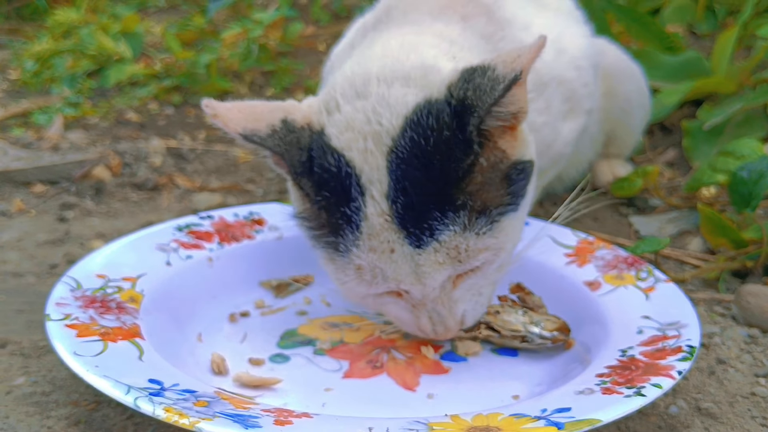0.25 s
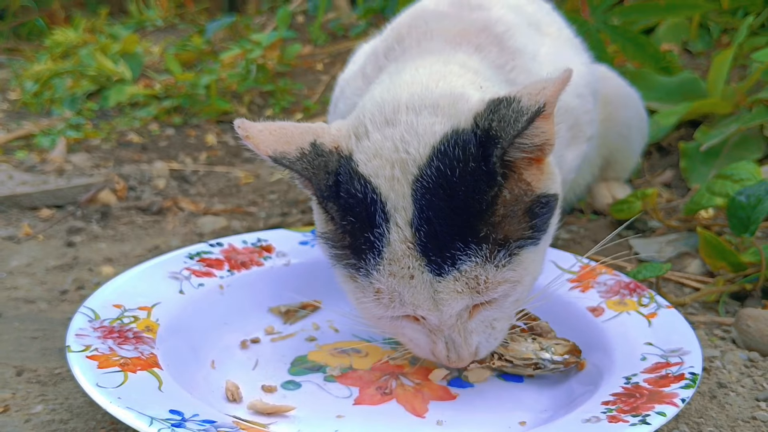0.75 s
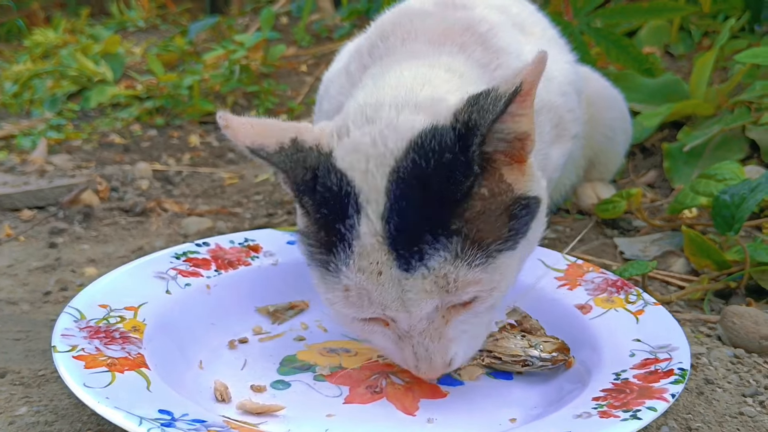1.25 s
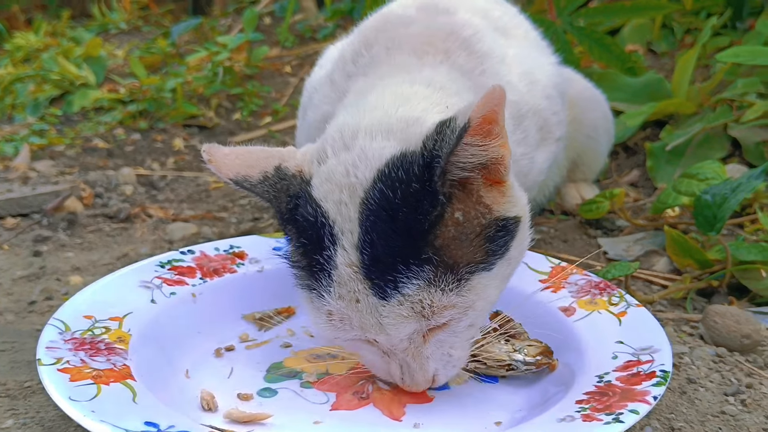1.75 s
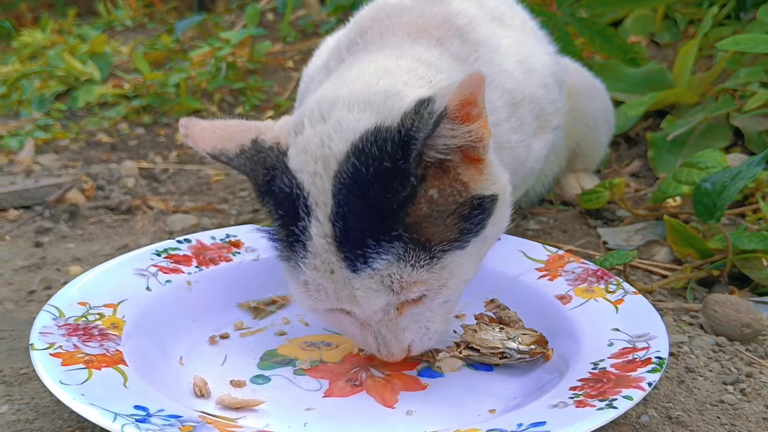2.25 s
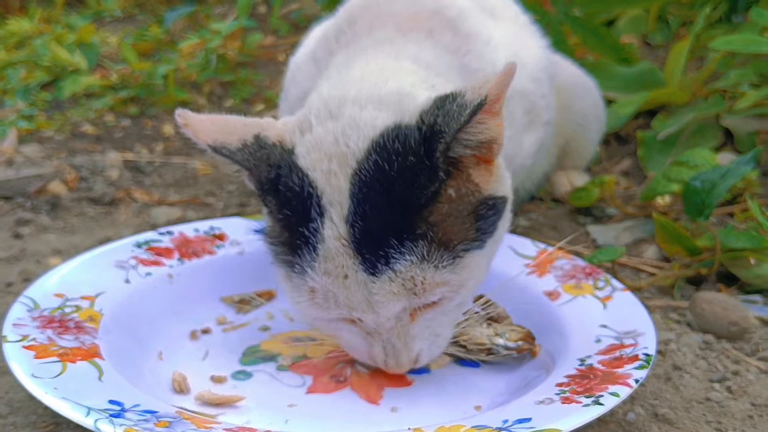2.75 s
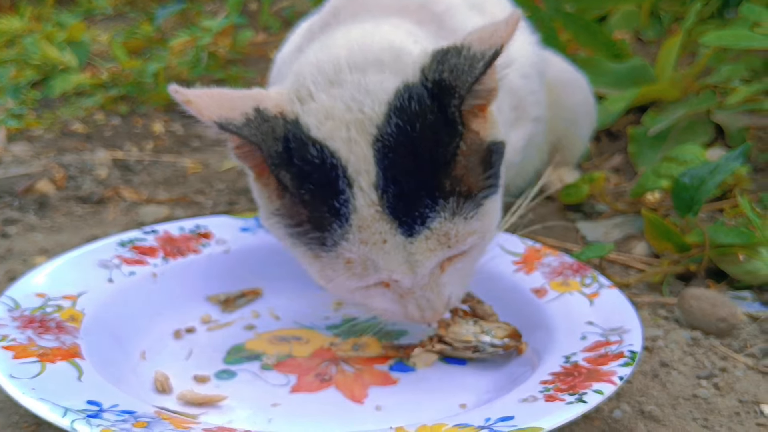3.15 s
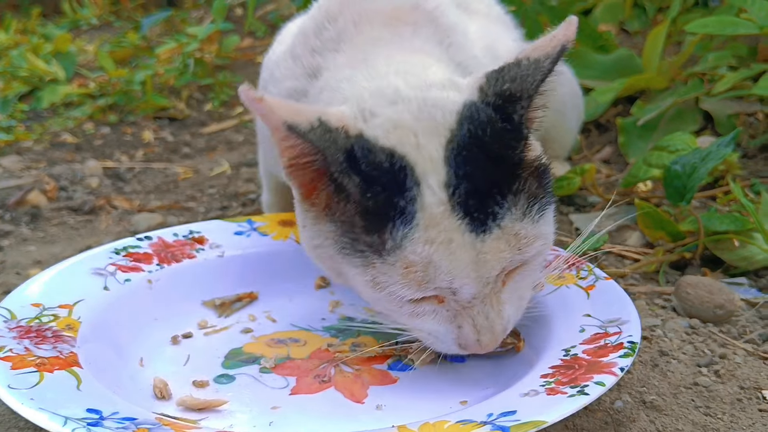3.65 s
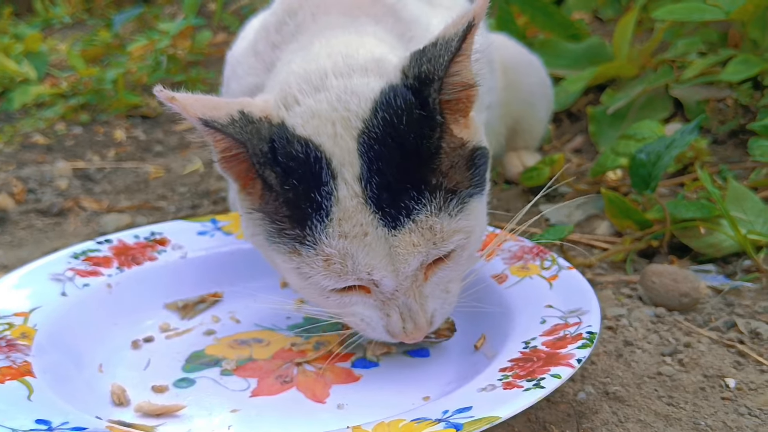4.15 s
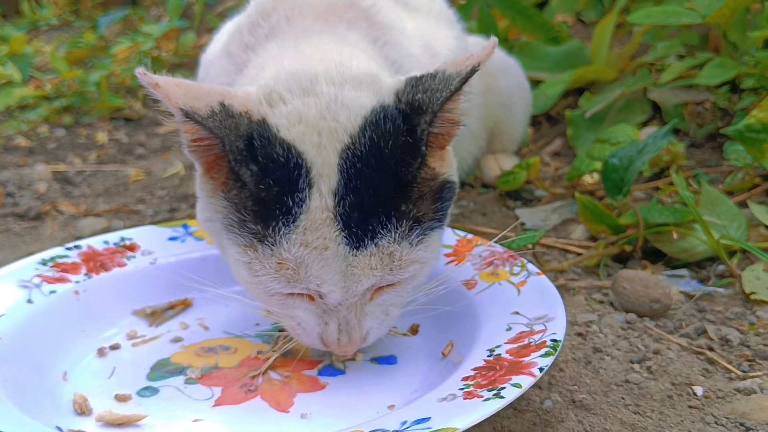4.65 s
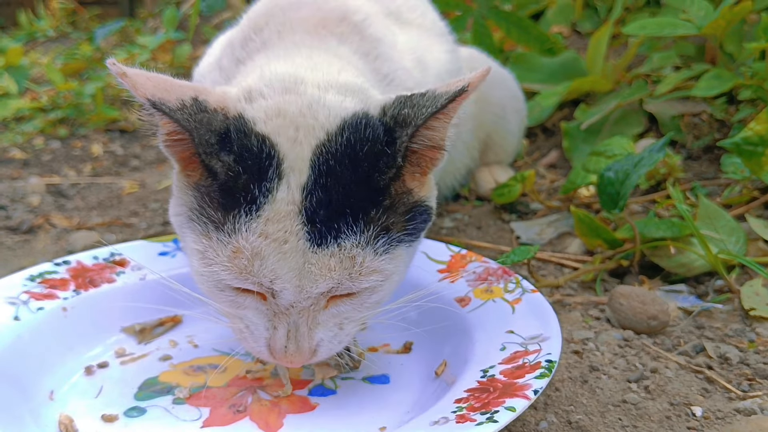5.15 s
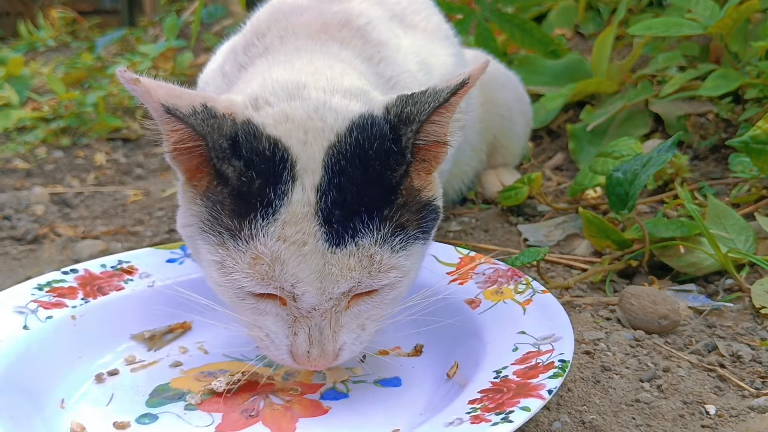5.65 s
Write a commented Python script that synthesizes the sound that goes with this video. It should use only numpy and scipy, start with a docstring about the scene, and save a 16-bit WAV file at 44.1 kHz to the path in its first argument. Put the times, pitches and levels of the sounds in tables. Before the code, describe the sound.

Close crisp bone-and-crust crunching by a cat eating from a plate outdoors, with a dull motor rumble, pulsing insects, chirps and a distant crow.

```python
"""A cat crunches fried fish on a plate, close by: sharp noise bursts are crust and small bones snapping.
Jaw crackle, wet smacks, tooth clacks and plate rings go with them, built from grains and fading tones.
Behind it lie a far motor (wavering tones in low noise), insects (narrow bands of noise in swells),
chirping birds (gliding tones), a rooster that crows once (hoarse harmonics), soft rustles and outdoor air."""
import sys
import numpy as np
from scipy import signal
from scipy.fft import rfft, irfft, next_fast_len
from scipy.io import wavfile
from scipy.ndimage import uniform_filter1d, map_coordinates

SR = 44100
rng = np.random.default_rng(int(sys.argv[2]) if len(sys.argv) > 2 else 0)


def file_out(sig):
    """Save sig as 16-bit WAV at sys.argv[1]."""
    # one column per channel
    cols = np.atleast_2d(sig).T
    # limit, then scale
    lim = np.clip(cols, -1, 1)
    pcm = np.round(lim * 32767).astype(np.int16)
    wavfile.write(sys.argv[1], SR, pcm)


N = 259749


def amp(db):
    """Turn decibels into gain."""
    return 10 ** (np.asarray(db) / 20)


def unit(x):
    """Scale to an average strength (rms) of 1."""
    return x / np.sqrt(np.mean(x ** 2) + 1e-20)


def along(points, hz):
    """Read a curve of (f/Hz, value) points on a logarithmic frequency axis."""
    f, v = np.transpose(points)
    return np.interp(np.log(hz + 1), np.log(f + 1), v)


def curves(rows):
    """Draw lines through timed rows: one value per sample for each column after the time."""
    s, *cols = np.transpose(rows)
    return [np.interp(np.arange(N) / SR, s, c) for c in cols]


def wobble(rate):
    """A smooth random curve with rate knots a second."""
    knots = rng.standard_normal(int(N * rate / SR) + 4)
    return map_coordinates(knots, [np.arange(N) * rate / SR])


def filtered(x, response):
    """Multiply the spectrum of x by a response of frequency."""
    m = next_fast_len(N + SR // 2)
    return irfft(rfft(x, m) * response(np.fft.rfftfreq(m, 1 / SR)), m)[..., :N]


def noise(spectrum, channels=2):
    """Coloured noise of rms 1, unrelated between channels."""
    white = rng.standard_normal((channels, N))
    return unit(filtered(white, lambda hz: amp(along(spectrum, hz))))


def field(spectrum, shared_db):
    """Stereo noise of rms 1, part of it common to both channels."""
    return unit(noise(spectrum) + amp(shared_db) * noise(spectrum, channels=1))


def coloured(x, spectrum, size=1024):
    """Colour without smearing attacks backwards in time; white noise keeps its energy."""
    gain = amp(along(spectrum, np.fft.rfftfreq(size, 1 / SR)))
    # folding the cepstrum gives a filter that starts at once (minimum phase)
    cepstrum = irfft(np.log(np.maximum(gain, 1e-2)))
    cepstrum[1:size // 2] *= 2
    cepstrum[size // 2 + 1:] = 0
    h = irfft(np.exp(rfft(cepstrum)))
    return signal.fftconvolve(x, h[None] / np.linalg.norm(h), axes=1)[:, :N]


def grains(grit_db, clump_db):
    """Tiny fractures as noise, uneven in size and bunched in time."""
    unevenness = amp(grit_db * wobble(900) + clump_db * wobble(120))
    return unit(unevenness * rng.standard_normal((2, N)))


def panned(pan_db):
    """Left and right gains of mean power 1; a positive pan is louder on the left."""
    return unit(amp([[pan_db / 2], [-pan_db / 2]]))


def lagged(x, lag_s):
    """Delay the left channel against the right."""
    sides = np.array([[-1], [1]])
    return filtered(x, lambda hz: np.exp(1j * np.pi * hz * lag_s * sides))


def add(track, s, sound):
    """Mix a short sound in at time s."""
    part = track[..., max(round(s * SR), 0):][..., :sound.shape[-1]]
    part += sound[..., :part.shape[-1]]


def cycle(hz):
    """Phase of a moving pitch."""
    return 2 * np.pi * np.cumsum(hz) / SR


def garden(x, t60, wet_db):
    """Direct sound plus scattered echoes that fade by 60 dB in t60 seconds, different in each channel."""
    t = np.arange(SR) / SR
    tail = rng.standard_normal((2, SR)) * amp(-60 * t / t60)
    echo = signal.fftconvolve(np.atleast_2d(x), unit(tail) / np.sqrt(SR), axes=1)[:, :N]
    return (x + amp(wet_db) * echo) / np.hypot(1, amp(wet_db))


# colour of the outdoor hush: f/Hz, relative level/dB (per Hz)
HUSH_COLOUR = [(100, 1.5), (350, -6), (500, -9.5), (620, -18), (760, -9.5), (950, -14.5), (1400, -16.5),
               (2400, -15.5), (4000, -20), (5500, -27), (7200, -30.5), (9600, -20), (11000, -24.5),
               (15800, -30)]
# the cat tugs at the fish and the plate shifts with a low wash: t/s, level/dB
TUGS = [(.5, -46.5), (2.28, -59), (4.02, -53.5), (4.6, -59), (5.09, -56)]
HUSH_DB, WASH_DB = -54.5, -56  # the wash is steady between tugs
TUG_S = 0.058  # half-length of a tug's swell


def air():
    """Steady outdoor hush from noise, with a low wash on the right that swells at each tug."""
    t = np.arange(N) / SR
    swell = amp(WASH_DB) + sum(amp(db) * np.exp(-((t - s) / TUG_S) ** 2) for s, db in TUGS)
    hush = amp(HUSH_DB) * field(HUSH_COLOUR, shared_db=-4.5) * panned(-1.8)
    # f/Hz, relative level/dB
    wash = field([(60, -50), (180, -3.5), (250, 9.5), (350, -9.0), (500, -8.5), (900, -40.0),
                  (2000, -23.0), (6000, -79)], shared_db=-4)
    return hush + swell * wash * panned(-7.0)


# the motor slows down unevenly: t/s, firing f/Hz
FIRING = [(0, 75), (.7, 73), (1.1, 61.84), (2.3, 68.07), (3, 57.96), (4.4, 50.06), (5.89, 53.07)]
# tones of the engine: multiple of the firing frequency, relative level/dB
ORDERS = [(1, -7.5), (2, -0.5), (3, -12)]
# bass roll-off of the engine tones: f/Hz, gain level/dB
BASS_ROLLOFF = [(48, -10), (58, -6), (68, -4)]
# how the rumble moves: t/s, deep throb relative level/dB, drone relative level/dB
RUMBLE = [(0.05, -64, -34.5), (0.24, -48.5, -40.5), (1.11, -62, -37.5), (1.15, -64, -33),
          (1.26, -52, -35.5), (1.52, -50, -38), (1.92, -42, -34.5), (2.04, -48, -38), (2.42, -37, -31.5),
          (3.28, -53, -40.5), (4.69, -50, -39), (4.73, -50, -37.5), (4.98, -59, -41.5),
          (5.07, -51.5, -39.5), (5.72, -55.5, -43.5), (5.85, -71, -42)]
# colours of the drone's noise and of the deep throb: f/Hz, relative level/dB (per Hz)
DRONE_COLOUR = [(40, -68), (75, -7.5), (98, -4), (112, -1), (135, -5), (160, -11), (195, -12), (260, -33.5),
                (400, -49), (900, -106)]
THROB_COLOUR = [(20, -65), (31, -34), (43, 7.5), (55, -3.5), (68, 4.5), (80, 4.5), (100, 11), (200, -48)]


def motor(deep_db=2, noise_db=-1.0, tone_db=-4.5):
    """A far engine: a few wavering firing tones in a dull rumble, nearly the same in both channels."""
    throb_db, drone_db = curves(RUMBLE)
    firing_hz, = curves(FIRING)
    phase = cycle(firing_hz * (1 + 0.0148 * wobble(12)))
    tone = np.zeros(N)
    for k, db in ORDERS:
        level_db = db + along(BASS_ROLLOFF, k * firing_hz) + 3.25 * wobble(8)
        tone += amp(level_db) * np.sin(k * phase)
    shared_noise = amp(noise_db) * noise(DRONE_COLOUR, channels=1)
    drone = shared_noise + amp(tone_db) * unit(tone) + amp(-27.5) * noise(DRONE_COLOUR)
    throb = noise(THROB_COLOUR, channels=1) + amp(-20) * noise(THROB_COLOUR)
    return amp(drone_db) * drone + amp(throb_db + deep_db) * throb


# two insects, each in its own rhythm: first buzz ends t/s, starting period t/s, shrink per buzz t/s,
# buzz length t/s, silent from t/s, relative level/dB, early f/Hz, midway f/Hz, late f/Hz
INSECTS = [(.615, .915, 0.011, 0.43, 6.3, -56, 8460, 8540, 8250),
           (.61, 1.29, 0.1, .41, 5.3, -67, 4820, 4850, 4790)]


def buzzes(count=7, gain_step_db=0.1):
    """Each insect repeats its buzz a little sooner and louder every time: (start s, end s, Hz, dB)."""
    k = np.arange(count)
    rows = []
    for first, period, shrink, length, silent, db, *drift_hz in INSECTS:
        ends = first + period * k - shrink * k ** 2 / 2
        drift_s = np.linspace(0, N / SR, len(drift_hz))
        for i, end in enumerate(ends):
            if end < silent:
                rows.append((end - length, end, np.interp(end, drift_s, drift_hz), db + gain_step_db * i))
    return rows


def insects(width=.065, crest=0.82, glide=.035, chorus_db=-68):
    """Narrow rasping bands swell slowly and unevenly, rise in pitch and stop faster, over a faint chorus."""
    out, t = np.zeros((2, N)), np.arange(N) / SR
    for start, end, hz, db in buzzes():
        u = (t - start) / (end - start)  # 0 to 1 over the buzz
        swell = np.interp(u, [0, crest, .9, 1], [0, 1, .8, 0]) * amp(1.8 * wobble(22))
        # a randomly moving strength and phase widens the tone into a band
        rasp = np.array([wobble(width * hz) + 1j * wobble(width * hz) for _ in out])
        pitch = hz * (1 + glide * (np.clip(u, 0, 1) - crest))
        band = np.real(rasp * np.exp(1j * cycle(pitch))) * np.sqrt(2)
        out += amp(db - 0.5) * swell * band
    # f/Hz, relative level/dB
    chorus = noise([(7000, -74), (7800, -4.0), (8100, 3.5), (8700, -15), (9000, -15), (9600, 4.0),
                    (10500, -38), (13000, -44)])
    return out + amp(chorus_db + 1.8 * wobble(5)) * chorus


# small birds: start t/s, length t/s, centre f/Hz, relative level/dB
CHIRPS = [(0.081, 0.11, 3870, -74), (0.197, 0.1, 3770, -67), (0.624, 0.07, 3420, -61),
          (0.657, 0.038, 3010, -62.5), (0.911, 0.045, 3270, -63), (1.089, 0.05, 3380, -61),
          (1.824, 0.094, 3730, -66.5), (2.808, 0.036, 3130, -62.5), (2.939, 0.017, 3404, -52.5),
          (3.194, 0.038, 3280, -59.5), (3.501, 0.029, 3240, -62.5), (3.566, 0.033, 3680, -60),
          (3.789, 0.0562, 3290, -61.5), (3.821, 0.037, 3720, -54.5), (4.11, 0.043, 3694, -54.5),
          (4.279, 0.051, 3670, -65.5), (4.355, 0.082, 3780, -58.5), (4.469, 0.049, 3710, -64),
          (4.845, 0.081, 3390, -65.5), (5.202, 0.085, 3400, -64.5)]
# one bird's whistle dips, then rises: t/s, f/Hz, relative level/dB
WHISTLE = [(5.45, 4020, -74), (5.47, 3670, -48.5), (5.5, 3360, -49), (5.54, 3540, -48), (5.575, 3670, -54),
           (5.605, 4390, -49), (5.625, 4750, -35.5), (5.637, 4830, -34.5), (5.65, 5170, -80)]
CHIRP_FALL = 0.0472  # share by which the pitch slurs down over a chirp


def birds(quaver=0.01):
    """Short slurred tones and one whistle, echoing among the trees."""
    chirps = np.zeros(N)
    for s, length, centre_hz, db in CHIRPS:
        u = np.linspace(0, 1, max(int(length * SR), 2))
        quavering = 1 + quaver * map_coordinates(rng.standard_normal(16), [15 * u])
        pitch = centre_hz * (1 + CHIRP_FALL * (.5 - u)) * quavering
        add(chirps, s, amp(db + 10.5) * np.sin(np.pi * u) * np.sin(cycle(pitch)))
    hz, db = curves(WHISTLE)
    sample = np.arange(N)
    sounding = (sample > WHISTLE[0][0] * SR) & (sample < WHISTLE[-1][0] * SR)
    whistle_tone = np.sin(cycle(hz * (1 + 0.0092 * wobble(200))))
    whistle = amp(db + 2.8 * wobble(70)) * sounding * whistle_tone
    far_chirps = garden(chirps, t60=.42, wet_db=5) * panned(-9.5)
    return far_chirps + garden(whistle, t60=0.22, wet_db=-8.0) * panned(-8.0)


# the four-part crow: t/s, pitch f/Hz, relative level/dB, second voice level/dB re first,
# lift of the top harmonic level/dB
CROW = [(3.22, 474, -95, -25, 0), (3.255, 481, -60, -25, 6), (3.33, 489, -55.5, -23, -2),
        (3.375, 478, -49.5, -27, -6), (3.43, 466, -55, -30, -7), (3.49, 467.4, -59.5, -22, -2),
        (3.55, 499, -92, -12, 0), (3.595, 556, -65, 11, 0), (3.64, 557, -50.5, -16, -6),
        (3.7, 566, -48, -11, -7), (3.76, 552.4, -57, -7, -2), (3.84, 555, -56, 2, 0),
        (3.92, 560, -50.5, -3, 0), (3.98, 570, -44.5, -9, -4), (4.15, 569, -44, -11, -2),
        (4.25, 545.6, -56, -3, 3), (4.33, 518, -58, -8, 0), (4.41, 511, -90, -5, 0),
        (4.54, 472, -80, -10, 0), (4.565, 472, -52, -7, 10), (4.6, 505, -53, -7, 16),
        (4.63, 539, -52.5, -20, 13), (4.68, 545.3, -49, -16, 25.5), (4.72, 535, -45, -1.5, 4),
        (4.75, 490, -51, -9, 8), (4.8, 464, -52, -12, 5), (4.83, 448, -100, -12, 3)]
# what the throat lets out: harmonic number, relative level/dB
THROAT = [(2, -13.5), (3, -38), (4, 0.5), (5, -23.5)]


def rooster(level_db=2, second_ratio=.905, hoarse=.019, flutter_db=4.5):
    """A hoarse distant crow that arches over each note, carried mostly by the fourth harmonic."""
    pitch, loud_db, second_db, lift_db = curves(CROW)
    top = THROAT[-1][0]

    def voice(hz):
        """Unsteady harmonics through the throat."""
        phase = cycle(hz * (1 + hoarse * wobble(140)))
        total = np.zeros(N)
        for k, level in THROAT:
            harmonic_db = level + lift_db * (k == top) + flutter_db * wobble(70)
            total += amp(harmonic_db) * np.sin(k * phase)
        return total

    # the other side of the syrinx joins in at a lower pitch
    call = voice(pitch) + amp(second_db) * voice(second_ratio * pitch)
    return garden(amp(loud_db + level_db) * call, t60=0.27, wet_db=5) * panned(-2.5)


# soft rustles and murmurs: start t/s, end t/s, centre f/Hz, width in octaves, relative level/dB,
# left re right level/dB
RUSTLES = [(0.467, 0.576, 2600, 1, -54.5, -1), (0, 0.66, 400, 0.18, -66, -8),
           (0.806, 1.653, 773, 0.1, -62.5, -15), (2.202, 2.702, 2530, 0.11, -60.5, 1),
           (3.235, 3.37, 14000, 0.21, -52, 22), (3.32, 3.45, 13800, .2, -62, 16),
           (3.41, 3.48, 14000, .17, -62, 16), (3.53, 3.63, 12500, .25, -60, -12),
           (4.31, 4.46, 13000, .3, -62, 2)]


def rustles(crest=0.072):
    """Noise bands rise quickly and fade: fur and fish brushing the plate, and faint far-off murmurs."""
    out, t = np.zeros((2, N)), np.arange(N) / SR
    for start, end, hz, octaves, db, pan_db in RUSTLES:
        swell = np.interp((t - start) / (end - start), [0, crest, 1], [0, 1, 0])
        white = rng.standard_normal((2, N))
        band = filtered(white, lambda f: np.exp(-.5 * (np.log2((f + 1) / hz) / octaves) ** 2))
        out += amp(db) * panned(pan_db) * swell * unit(band)
    return out * amp(4.1 * wobble(250))


# the fish nudged against the plate: t/s, relative level/dB, ring f/Hz
BUMPS = [(.468, -24, 1305), (0.474, -33, 1230), (0.481, -42, 1020), (.5, -33.5, 1270), (.515, -39, 1260),
         (0.799, -40, 1246), (1.012, -46, 1290), (2.784, -44, 960), (2.99, -38.5, 1570),
         (3.115, -34.5, 1523), (3.835, -40, 1375), (4.045, -34.5, 1300), (5.494, -38, 990),
         (5.839, -37, 1230), (5.871, -46, 1260)]


def bumps(spread=0.07, left_db=-5, t60=.045):
    """Soft contacts wake a cluster of fading plate tones, louder on the right."""
    out, t = np.zeros((2, N)), np.arange(SR // 10) / SR
    for s, db, hz in BUMPS:
        modes = hz * np.exp(rng.normal(0, spread, (4, 1)))
        ring = np.sin(2 * np.pi * hz * t) + 0.36 * np.sin(2 * np.pi * modes * t).sum(0)
        ring = ring * amp(db - 60 * t / t60) * (1 - np.exp(-t / 0.00049))  # soft onset
        add(out[0], s, amp(left_db) * ring)
        add(out[1], s, ring)
    return out


# wet smacks of tongue and lips: t/s, relative level/dB, starting mouth cavity f/Hz
SMACKS = [(4.7989, -35.5, 1140), (4.942, -42.5, 1120), (5.04, -38, 1040), (5.048, -36, 997),
          (5.054, -40, 975), (5.072, -37, 1013), (5.08, -42, 990), (5.094, -44, 1190), (5.104, -44, 1210),
          (5.142, -44, 1150), (5.1584, -30, 1214), (5.1679, -32, 1214), (5.178, -49, 1080),
          (5.267, -41, 1250), (5.279, -47, 1460), (5.3217, -46, 1130), (5.3686, -48, 1460),
          (5.857, -44, 1220), (5.875, -45, 1250), (5.884, -41, 1210)]
UPPER_HZ, UPPER_DB = 1917, -3  # the cavity's second resonance: average starting pitch, level re first
LOWER_T60, UPPER_T60 = 0.029, 0.035  # seconds to fade by 60 dB


def smacks(attack_s=0.0012, opening=1.2, rough=0.25):
    """A wet seal parts and pops the mouth's two resonances, whose pitch rises as the lips open."""
    out, t = np.zeros((2, N)), np.arange(SR // 16) / SR
    for s, db, hz in SMACKS:
        glide = 1 + opening * t
        upper_hz = UPPER_HZ * rng.normal(1, 0.031)
        lower = amp(-60 * t / LOWER_T60) * np.sin(cycle(hz * glide))
        upper = amp(UPPER_DB - 60 * t / UPPER_T60) * np.sin(cycle(upper_hz * glide))
        ragged = 1 + rough * unit(uniform_filter1d(rng.standard_normal(len(t)), size=60))
        attack = 1 - np.exp(-t / attack_s)
        add(out, s, amp(db) * panned(-8.0) * ragged * (lower + upper) * attack)
    return out


# the jaw grinding a mouthful: start t/s, end t/s, crust relative level/dB, jaw relative level/dB
GRINDS = [(3.86, 4.1, -62, -61), (4.611, 4.679, -43, -54), (4.792, 4.851, -58, -49),
          (4.853, 4.993, -63, -56.5), (5.021, 5.098, -43, -45), (5.078, 5.136, -40, -63),
          (5.156, 5.185, -32, -41.5), (5.255, 5.317, -62, -52), (5.31, 5.425, -79, -61),
          (5.46, 5.666, -54.5, -73), (5.832, 5.927, -43, -49.5)]
# colours of broken crust (also used by the bites) and of the jaw: f/Hz, relative level/dB (per Hz)
CRUST_COLOUR = [(2500, -39), (3700, -26), (4400, -13), (5600, -6), (7000, -7), (8200, 0.5), (8900, -2.5),
                (9650, 4.5), (10700, -3), (12000, 1), (13700, -2), (15600, -2), (16300, -17), (17000, -29)]
JAW_COLOUR = [(250, 4.5), (600, -21), (900, -11), (1050, 0.5), (1250, -2), (1550, -5), (2050, -7),
              (2500, -11.5), (3300, -14.5), (6000, -16.5)]
STROKE_RISE, STROKE_FALL = 0.28, 0.27  # shares of a stroke in which the pressure builds and lets go


def crackle():
    """Each stroke of the jaw grinds out fine crackle and sounds through the jaw itself."""
    t = np.arange(N) / SR
    crust, jaw = np.zeros((2, N))
    for start, end, crust_db, jaw_db in GRINDS:
        u = (t - start) / (end - start)
        stroke = np.clip(np.minimum(u / STROKE_RISE, (1 - u) / STROKE_FALL), 0, 1)
        crust += amp(crust_db) * stroke
        jaw += amp(jaw_db) * stroke
    fizz = coloured(crust * grains(grit_db=6, clump_db=5), CRUST_COLOUR)
    body = coloured(jaw * grains(grit_db=3.0, clump_db=6.0), JAW_COLOUR)
    return (fizz + body) * panned(-3.8)


# bones cracking in the closed mouth: t/s, relative level/dB, ring f/Hz
CRACKS = [(.131, -53, 3300), (.262, -50, 3600), (.552, -48, 4730), (1.123, -54, 6000), (1.832, -41.5, 6200),
          (2.138, -52, 4500), (2.151, -45, 3900), (2.2385, -39, 4460), (2.251, -33.5, 3900),
          (2.26, -35, 5060), (2.279, -46, 5400), (4.042, -43, 4160), (4.642, -40, 6150), (4.652, -44, 6000),
          (4.689, -36.5, 5740), (5.301, -49, 3620), (5.6895, -54, 2300)]
# what the cheek lets through: f/Hz, gain level/dB
CHEEK = [(600, -14), (2000, 3), (6000, -1.5), (7200, -22), (16000, -22)]


def cracks(t60=0.03, sharpness=7, second_ratio=0.685, second_db=-7, grit_db=4):
    """A bone cracks behind the cheek: a gritty burst rings at the bone's own pitch and a lower one."""
    out, t = np.zeros((2, N)), np.arange(SR // 16) / SR
    for s, db, hz in CRACKS:
        white = rng.standard_normal((2, len(t))) + rng.standard_normal(len(t))
        upper = unit(signal.lfilter(*signal.iirpeak(hz, sharpness, SR), white))
        lower = unit(signal.lfilter(*signal.iirpeak(hz * second_ratio, sharpness, SR), white))
        rough = unit(uniform_filter1d(rng.standard_normal(len(t)), size=50))
        shape = amp(db - 60 * t / t60) * (1 - np.exp(-t / 0.00068)) * unit(amp(grit_db * rough))
        add(out, s, shape * panned(-7.5) * (upper + amp(second_db) * lower))
    return filtered(out, lambda hz: amp(along(CHEEK, hz)))


# teeth meeting hard as a bone gives way: t/s, relative level/dB
CLACKS = [(.4686, -20), (4.565, -3)]
# colour of a clack: f/Hz, relative level/dB
TEETH_COLOUR = [(100, -5), (400, -1), (1200, -3), (2300, 4.5), (4500, -2.5), (6500, -5), (8200, 5.5),
                (10000, 1.5), (16000, -20)]


def clacks():
    """One hard push (a single pulse) through teeth and skull, reaching from the bass to the treble."""
    blows = np.zeros((2, N))
    for s, db in CLACKS:
        add(blows, s, amp(db) * panned(-13.5))
    return coloured(blows, TEETH_COLOUR)


def burst(t, snap_s=0.00058, tail_db=-18, tail_t60=0.073, lead_t60=0.025, flake_hz=11500, flake=1.0):
    """One fracture: a short faint noise lead-in, a quick snap and a ragged trail, tinted by the flake."""
    rise = np.maximum(t, 0) / snap_s
    snap = rise ** 2 * np.exp(2 * (1 - rise))
    ragged = unit(amp(4 * unit(uniform_filter1d(rng.standard_normal(len(t)), size=40))))
    # the lead-in grows before t = 0 and the trail fades after it
    trail_db = tail_db - 60 * np.maximum(t / tail_t60, -t / lead_t60)
    shape = snap + amp(trail_db) * ragged
    white = rng.standard_normal((2, len(t))) + 0.76 * rng.standard_normal(len(t))
    pitch = np.clip(flake_hz * np.exp(rng.normal(0, .3)), 4000, 15500)
    tinted = white + flake * unit(signal.lfilter(*signal.iirpeak(pitch, 5, SR), white))
    return unit(shape * tinted) * np.sqrt(np.mean(shape ** 2))


# plate tones: average f/Hz, average relative level/dB, fade by 60 dB t/s
PLATE = [(1013, 0, 0.13), (1170, 13.5, 0.0092), (1493, 0, 0.065), (2060, 17.5, 0.0066),
         (2720, 14.5, 0.0053)]


def plate_ring(t):
    """Fading plate tones, slightly different at every knock."""
    ring = 0
    for hz, level, t60 in PLATE:
        fade = amp(level + rng.normal(0, 1.6) - 60 * t / t60)
        knock_hz = hz * rng.normal(1, 0.0274)
        ring = ring + fade * np.sin(2 * np.pi * knock_hz * t + rng.normal(0, 1.95, (2, 1)))
    return ring


# teeth breaking crust and bone: t/s, relative level/dB, mouth level/dB re that,
# plate knock level/dB re that, left re right level/dB
BITES = [(.468, -22, -6, -10.5, -3), (.497, -34.5, -10, -10, -2), (.654, -41, -16, -9, 2),
         (0.9654, -24, -8, -27, -13), (1.729, -41.5, 1, 0.5, -10), (3.227, -32, -14, -20, 15),
         (2.26, -29.5, 9, -21, -0.5), (2.4894, -38.5, -5, -12, -4), (2.975, -38, -19, -17, -14),
         (2.99, -22, -10, -13.5, -18), (3.1058, -34.5, -20, -17, -9), (3.113, -44.5, 10, 6.5, -14),
         (3.234, -23.5, -15.5, -11, 19), (3.466, -35, -31, -38, -13), (3.501, -43, -14, -5, -8),
         (3.532, -28, -30, -37, -25), (3.599, -38.5, -20, -7, -15), (3.8107, -35, -7, -4, -13),
         (3.826, -40.5, 0, 10, -4), (3.934, -33, -20, -30, -10), (4.03, -22, -6, -15, -8),
         (4.042, -37, 7, -2, -12), (4.054, -28.5, -7, -1, -21), (4.0756, -28, -11, -9.5, -12),
         (4.194, -36.5, 4.5, -4, -11), (4.263, -39, 1.5, 7, -14), (4.502, -34, -8, -28, -5),
         (4.511, -27.5, -26, -36, -6), (4.5578, -38, 3, 9, -9), (4.561, -23, -25, -22, -5),
         (4.5647, -8.5, -15.5, -24, -3.5), (4.584, -23.5, -30, -21, -3), (4.6026, -14, -19, -34, -6),
         (4.607, -21, -23, -38, -5), (4.619, -28, -22, -35, -6), (4.633, -28, -22, -38, -8),
         (4.639, -24, -21, -40, -6), (4.6477, -23, -19, -35, -6), (4.658, -24, -20, -38, -7),
         (4.671, -29, -14, -35, -2), (4.691, -22, -17, -22, -2), (4.802, -40, -2, 3, -17),
         (4.9664, -24, -12, -14.5, -12), (5.0044, -23, -22, -23, -8), (5.023, -30, -28, -19, -10),
         (5.0305, -27, -25, -28, -6), (5.035, -28, -25, -30, -6), (5.0396, -14.5, -40, -38, -11),
         (5.056, -23, -14, -25, -9), (5.072, -11, -15, -35, -4), (5.0942, -13, -18, -29, -6),
         (5.105, -22, -13, -28, -5), (5.113, -15, -26, -45, 1), (5.1245, -15, -29, -45, -7),
         (5.128, -16, -24, -45, -6), (5.144, -15.5, -14, -31, -2), (5.151, -20, -23, -26, -3),
         (5.1597, -12, -15, -34, -11), (5.1628, -20, -17, -28, -4), (5.1655, -23, -20, -28, -2),
         (5.169, -8, -30, -38, -1), (5.174, -11, -31, -33, -3), (5.179, -6.5, -25.5, -48, -3.5),
         (5.193, -19.5, -12, -36, -4), (5.267, -27, -3.5, -18, -19), (5.286, -39, -6, -14, -12),
         (5.38, -33, -8, -11, -23), (5.498, -32, -1, -9, -10), (5.53, -26.5, 0, -28, -12),
         (5.536, -29.5, 3, -20, -12), (5.561, -37, -6, -27, -10), (5.588, -37, -16, -30, -12),
         (5.612, -26.5, -17, -36, -10), (5.81, -35, -24, -22, -9), (5.858, -28, -18, -31, 2),
         (5.8638, -24, -10.5, -22, -5), (5.876, -27, -4, -22, -2), (5.883, -28, -3, -24, -6)]
# colour of the snaps in the mouth: f/Hz, relative level/dB
MOUTH_COLOUR = [(400, -4), (1800, -4.5), (2300, 10), (2800, 8), (4400, 13), (5600, 8.5), (7000, -13.5),
                (11000, -30)]


def bites(crust_db=-8, mouth_db=-11, knock_db=-20, splinter_db=-18, count=2):
    """Each snap is bright in the crust, duller in the mouth, and rings the plate briefly."""
    crust, mouth, plate = np.zeros((3, 2, N))
    t = np.arange(SR // 16) / SR
    lead = .01  # seconds of lead-in before the snap
    for s, db, dull_db, ring_db, pan_db in BITES:
        gain = amp(db) * panned(pan_db)
        add(crust, s - lead, gain * burst(t - lead))
        dull = burst(t - lead, snap_s=0.00046, tail_db=-10.5, tail_t60=0.083, flake_hz=5030, flake=0.12)
        add(mouth, s - lead, gain * amp(dull_db) * dull)
        # smaller splinters give way within milliseconds of the main break
        for offset_s, size_db in rng.normal([.002, 0], [.005, 3], (count, 2)):
            splinter = amp(splinter_db + size_db) * burst(t - lead)
            add(crust, s - lead + offset_s, gain * splinter)
        add(plate, s, amp(db + ring_db) * panned(pan_db / 2) * plate_ring(t))
    bright = amp(crust_db) * coloured(crust, CRUST_COLOUR)
    return bright + amp(mouth_db) * coloured(mouth, MOUTH_COLOUR) + amp(knock_db) * plate


GARDEN_LAG_S, CAT_LAG_S = 0.000459, 0.00015  # the left channel hears them this much later than the right
PLATE_LAG_S = 0.00043  # the same for the plate, which lies further to the right


def scene():
    """The cat close by and a little to the right, the garden around it."""
    background = air() + motor() + insects() + birds() + rooster() + rustles()
    chewing = bites() + cracks() + clacks() + smacks() + crackle()
    eating = lagged(chewing, CAT_LAG_S) + lagged(bumps(), PLATE_LAG_S)
    return garden(eating, t60=.1, wet_db=-14) + lagged(background, GARDEN_LAG_S)


TOP_HZ = 16250  # band limit


def record(dry):
    """A very steep cut removes the treble above the band limit."""
    return filtered(dry, lambda hz: 1 / np.sqrt(1 + (hz / TOP_HZ) ** 120))


dry = scene()
out = record(dry)
file_out(out)
```